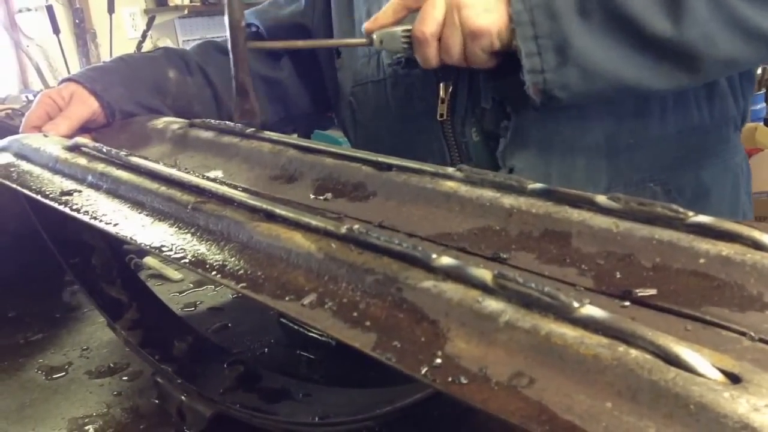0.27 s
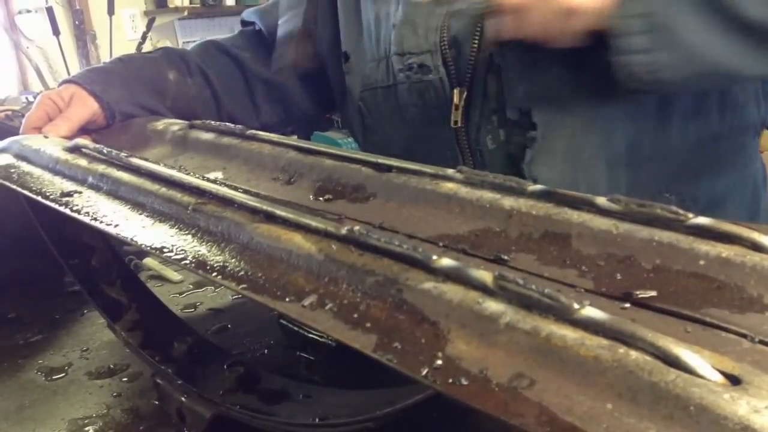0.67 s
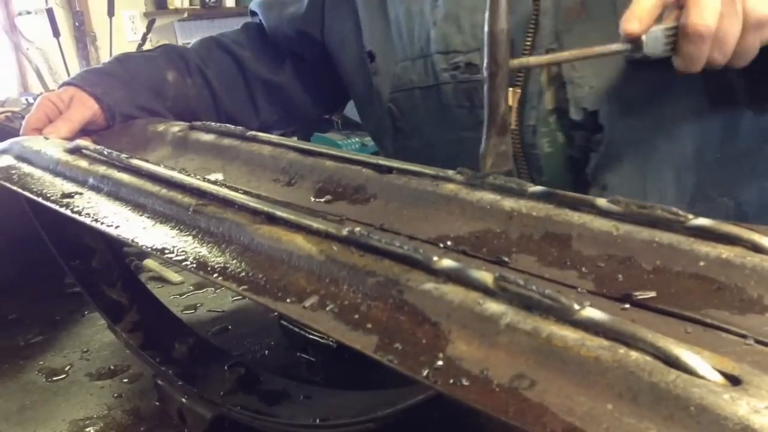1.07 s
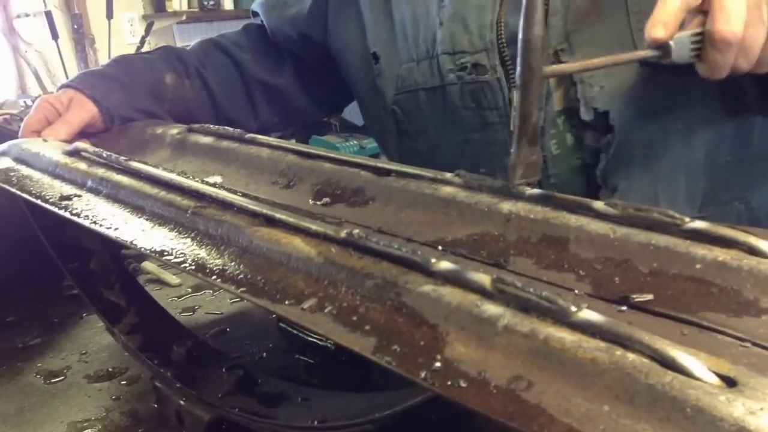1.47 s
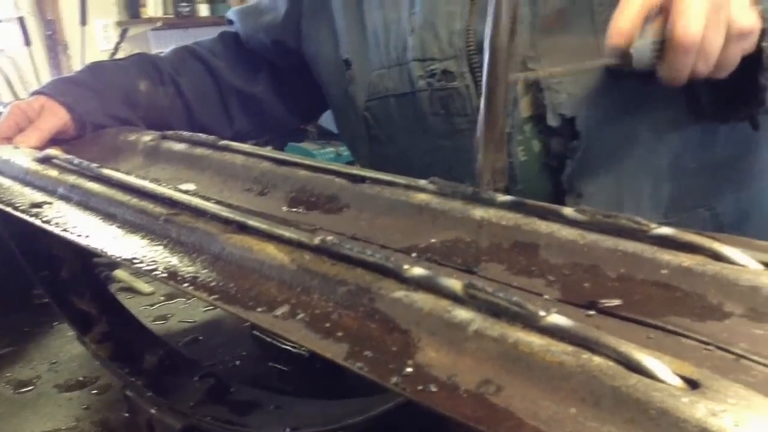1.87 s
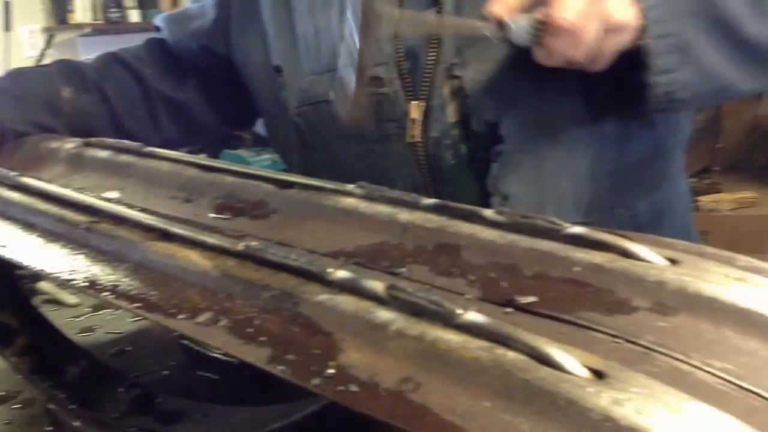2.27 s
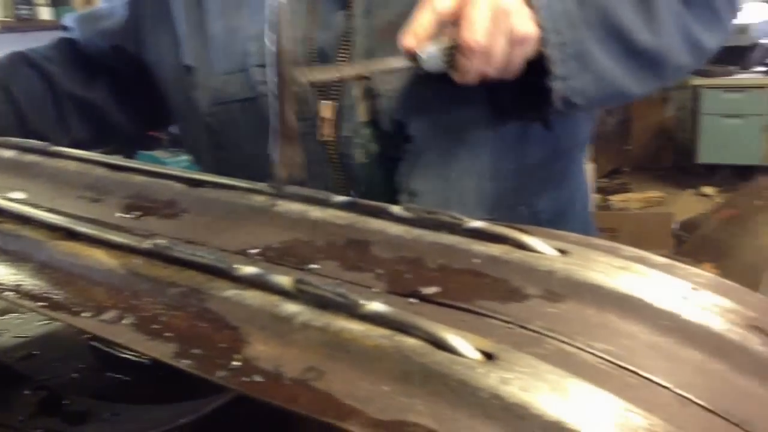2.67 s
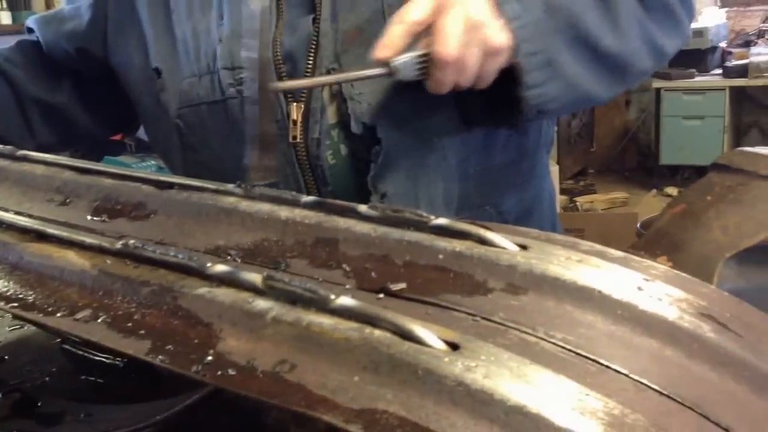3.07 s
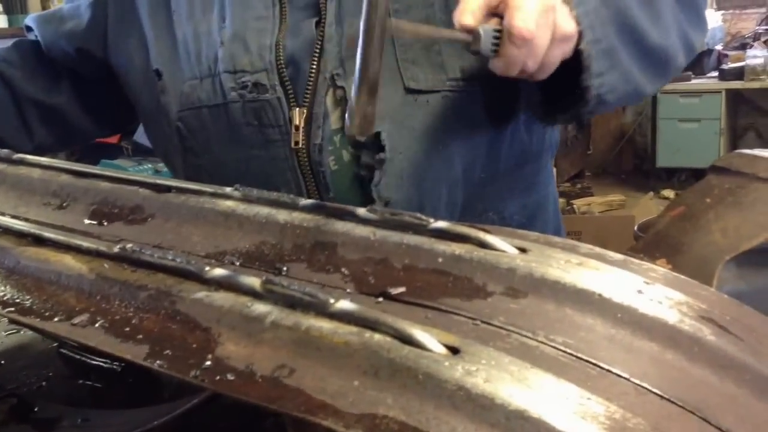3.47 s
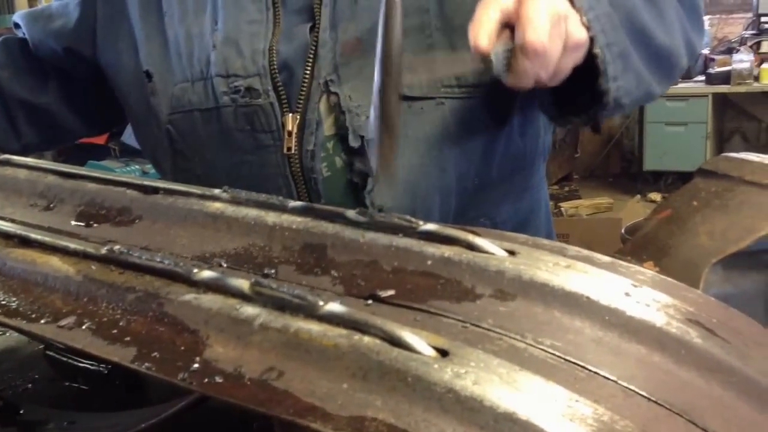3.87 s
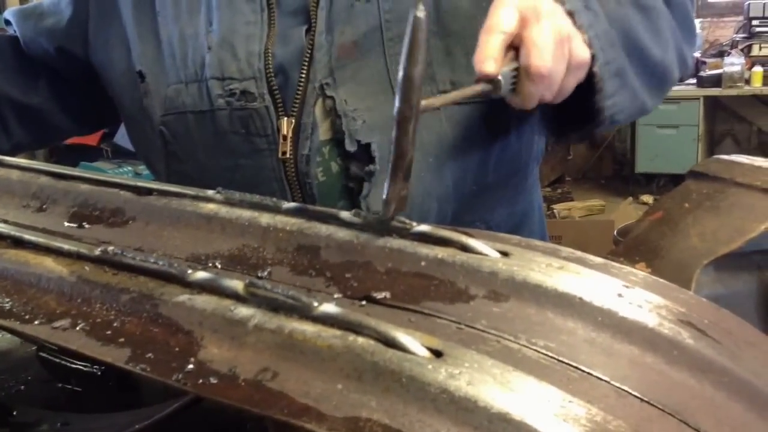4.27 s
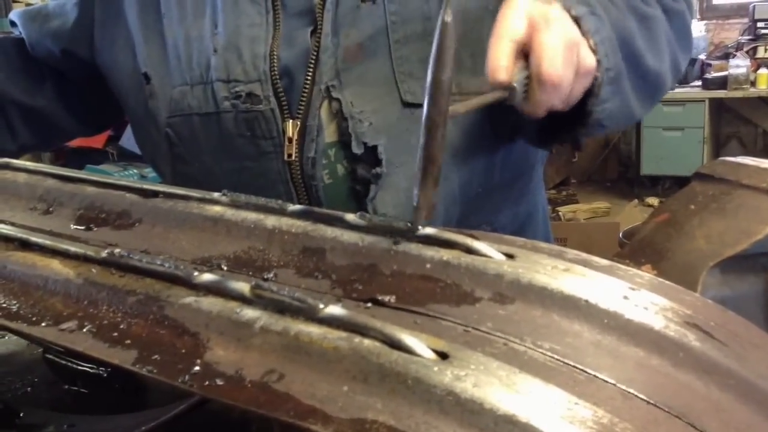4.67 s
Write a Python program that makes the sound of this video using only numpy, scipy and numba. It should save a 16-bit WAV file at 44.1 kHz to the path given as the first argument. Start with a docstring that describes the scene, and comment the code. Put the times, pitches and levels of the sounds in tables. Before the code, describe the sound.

Close to a camera microphone in a small workshop, a chipping hammer hits a long steel runner in quick, even blows. Each gives a sharp gritty crack and a hard clanging ring, soon damped. After four strokes there is a brief pause with slag chips skittering, then steady hammering resumes to the end, the last blow strongest.

```python
"""In a small workshop, a chipping hammer knocks slag off weld beads on a long curved steel runner.
Each blow is a burst of bright noise plus ringing steel: fading sine waves for the clear tones, and bands
of noise for the many tones that blur into a clang. Hand and bench damp the ringing.
Slag crumbs and chips are grainy hiss, bench jolts are low sine waves, and the room adds a short noise tail.
A camera close by cuts the bass, holds down loud peaks and removes the top treble; faint noise runs throughout."""
import sys
import numpy as np
from scipy import signal
from scipy.fft import rfft, irfft, next_fast_len
from scipy.io import wavfile
from numba import njit

SR = 44100
rng = np.random.default_rng(int(sys.argv[2]) if len(sys.argv) > 2 else 0)


def dump_mix(stems):
    """Bounce the given channels to the path in sys.argv[1] as a 16-bit WAV at rate SR."""
    frames = np.atleast_2d(stems).T  # one column per channel
    limited = np.clip(frames, -1, 1)  # hard clip at full scale
    pcm = np.round(limited * 32767).astype(np.int16)
    wavfile.write(sys.argv[1], SR, pcm)


N = 211937
# extra samples before time 0, for the blow that falls earlier; the total suits a fast Fourier transform
LEAD = next_fast_len(N + SR // 4) - N


def undb(db):
    """Turn decibels into a plain amplitude factor."""
    return 10 ** (np.asarray(db) / 20)


def along(hz, table, column):
    """Read a table between its rows, on a log-frequency axis."""
    table = np.array(table)
    return np.interp(np.log(hz), np.log(table[:, 0]), table[:, column])


def colour(x, gain):
    """Shape the spectrum of x by gain(Hz)."""
    hz = np.maximum(np.fft.rfftfreq(len(x), 1 / SR), 1)
    return irfft(rfft(x) * gain(hz), len(x))


def grit(total, grain_db, grain_s=0.0025):
    """Noise whose level jumps at random from one short grain to the next."""
    size = max(int(grain_s * SR), 1)
    grains = rng.standard_normal(total // size + 1)
    steps = np.repeat(grains, size)[:total]
    return rng.standard_normal(total) * undb(grain_db * steps)


def bursts(times, dbs, t60s, shape):
    """Add a fading shape(t, number) at each time; each burst stops after a third of a second."""
    out = np.zeros(N + LEAD + SR)
    t = np.arange(SR // 3) / SR
    for k, (s, db, t60) in enumerate(zip(times, dbs, t60s)):
        i = int(s * SR) + LEAD
        out[i:i + len(t)] += undb(db - 60 * t / t60) * shape(t, k)
    return out[:N + LEAD]


@njit
def ring(starts, kicks, poles, rise, brake):
    """Each mode (one way the steel vibrates) is kicked by every blow, swells in by rise and dies away."""
    out = np.zeros(starts[-1])
    for m in range(kicks.shape[1]):
        z, late = 0j, 0j
        for b in range(len(starts) - 1):
            z += kicks[b, m]
            # taking away a copy that dies sooner makes the new kick swell in
            late = kicks[b, m]
            p = poles[b, m]
            for i in range(starts[b], starts[b + 1]):
                out[i] += (z - late).imag
                z *= p
                late = late * p * rise + 1e-30
                # damping tightens until the next blow resets it
                p *= brake
    return out


# Hammer blows: t/s, strength level/dB (relative), treble level/dB, low clatter level/dB,
# ring length factor, bench jolt level/dB, slag crumbs level/dB,
# landing place along the runner/cm, distance off its centre line/cm
BLOWS = [(-0.15, 0.5, -4, -6, 1.1, -43.5, -34.0, 18.8, -6),
         (0.0669, 1.0, -3.5, -2.5, 0.72, -58.0, -36.0, 16.5, -8),
         (0.2749, 2.5, 1, -4.5, 0.81, -52.0, -26.5, 32.9, 5.5),
         (0.4747, 2.0, -2.5, -0.5, 0.8, -55.0, -33, 31.5, -5.5),
         (0.6916, -2.0, 1.5, 2.5, 1.02, -57.0, -42.0, 17.4, -8),
         (1.2744, 3.0, -5.5, -3.0, 0.9, -54.0, -44.0, 36, 5.5),
         (1.496, 2.5, -2.0, -0.5, 0.6, -53.0, -50, 40.4, 0.5),
         (1.701, -2, 6.5, 1.0, 0.91, -29, -36.0, 35, -5.5),
         (1.9151, 3.5, -5.5, -4.5, 0.79, -57.0, -35.0, 38.1, 6.5),
         (2.13, 2.0, 4, -4.5, 0.94, -20.0, -48.0, 41.1, -7.5),
         (2.378, 1.5, 1, -3.0, 0.97, -29, -29.5, 45, 10),
         (2.6055, 0.5, -6.5, -2.5, 1.006, -50.0, -48, 41.9, 1.3),
         (2.8445, 0.5, 2, 0, 1.09, -32.0, -29.5, 46, 8.5),
         (3.0766, 1.5, 1.5, -1, 1.05, -42.0, -34.0, 53.5, 4.6),
         (3.2833, 4.5, 1, -5, 1.01, -57.0, -30.5, 54.5, 4.5),
         (3.5734, 3.0, -1.5, -1.5, 1.01, -32, -26.5, 70.6, 1.1),
         (3.7957, 0.5, -0.5, -2, 1.02, -48.0, -41, 76.8, 0.7),
         (4.0192, 4.5, 1, 0.5, 0.79, -36.0, -32, 83.2, -1.3),
         (4.248, 3.0, 0.5, -2.5, 0.95, -23.0, -34, 79.6, -5.5),
         (4.4779, 4, -2.5, -2.0, 0.87, -41.0, -28.5, 81.0, -5.5),
         (4.7052, 9, 4.0, -4.5, 1.1, -35.0, -32.0, 104, 1.2)]


def cracks(crack_db=-3, t60=0.057, dull_hz=10000):
    """Brittle slag breaks under the hammer's edge: a short bright burst of grainy noise."""
    blows = np.array(BLOWS)
    x = bursts(blows[:, 0], blows[:, 1] + crack_db, np.full(len(blows), t60),
               lambda t, k: grit(len(t), 4.6))
    band = signal.butter(1, [2500, dull_hz], "band", fs=SR, output="sos")
    return signal.sosfilt(band, x)


# Clear tones of the runner: f/Hz, t60/s (time to fade by 60 dB, before the ring length factor),
# level/dB at an antinode (spot of strongest vibration), node (still spot) spacing along/cm,
# an antinode along/cm, node spacing across/cm, an antinode across/cm
TONES = [(486, 0.52, -20, 22.6, 4.2, 75.7, 41.7), (702.0, 0.76, -16, 44.0, 14.7, 8.64, 5.93),
         (987.0, 0.58, -19, 7.4, 1.0, 30.6, 0.2), (1104.0, 0.51, -15, 45.5, 17.8, 9.97, 8.13),
         (1158.4, 0.69, -15, 46.3, 18.4, 19.34, 17.5), (1395, 0.49, -16.5, 52, 37, 27.3, 10.9),
         (1853, 0.19, -4, 22.96, 3.8, 8.34, 6.1), (1978, 0.39, -12, 12.1, 1.07, 7.3, 2.9),
         (2655, 0.19, -8.9, 18.05, 10.44, 15, 3.85)]


def standing(blows, tones, node_leak=0.09):
    """Level in dB of each clear tone: full at an antinode of its standing wave, faint at a node."""
    lengthwise = np.cos(np.pi * (blows[:, 7:8] - tones[:, 4]) / tones[:, 3])
    crosswise = np.cos(np.pi * (blows[:, 8:9] - tones[:, 6]) / tones[:, 5])
    # node_leak: share of a tone that still sounds when the hammer lands on a node
    return tones[:, 2] + 20 * np.log10(np.hypot(lengthwise * crosswise, node_leak))


def clank(blows, starts, force_db, grip, centre_hz=2644, spread_octaves=0.061, level_db=-21.5,
          scatter_db=4.5, t60_s=0.19, rise_s=0.0042, count=12):
    """A knot of close modes round the highest clear tone, struck hardest where that tone is."""
    hz = centre_hz * 2 ** (spread_octaves * rng.standard_normal(count))
    chance = rng.standard_normal((len(blows), 2, count))
    place_db = standing(blows, np.array(TONES))[:, -1:] - TONES[-1][2]
    db = force_db + place_db + level_db + scatter_db * chance[:, 0]
    poles = np.exp((2j * np.pi * hz - np.log(1000) / (t60_s * grip)) / SR)
    kicks = undb(db) * np.exp(2j * chance[:, 1])
    return ring(starts, kicks, poles, np.exp(-1 / (rise_s * SR)), 1.)


# Plate modes so close that they blur into a clang:
# f/Hz, level/dB per third of an octave, t60/s (before the ring length factor)
CROWD = [(60, -31, 0.89), (131, -50, 0.49), (256, -41.5, 0.34), (444, -35, 0.46), (844, -37, 0.42),
         (1120, -23, 0.29), (1590, -30, 0.38), (2260, -20.5, 0.25), (3980, -23, 0.26), (5570, -22.5, 0.23),
         (10370, -22.5, 0.13), (12700, -28, 0.093), (15200, -49, 0.081)]


def crowd(blows, starts, force_db, grip, scatter_db=1.88, rise_s=0.005, settle_s=0.56,
          jag_db=1.0, spacing_hz=25):
    """Overlapping plate modes: bands of noise, each with its own fading, struck together."""
    total = starts[-1]
    out = np.zeros(total)
    bins = np.maximum(np.fft.rfftfreq(total, 1 / SR), 1)
    # a jagged spectrum lets some of the overlapping modes stand out a little
    jags = np.interp(bins, np.arange(1500) * spacing_hz, rng.standard_normal(1500))
    thicket = rfft(rng.standard_normal(total)) * undb(jag_db * jags)
    rise, brake = np.exp(-1 / (rise_s * SR)), np.exp(-1 / (settle_s * SR) ** 2)
    for f in 62.5 * 2 ** (np.arange(25) / 3):
        # how far the blow's treble and low clatter settings reach into this band
        sharp = 1 / (1 + (4000 / f) ** 2)
        dull = 1 / (1 + (f / 600) ** 4)
        db = force_db + along(f, CROWD, 1) + sharp * blows[:, 2:3] + dull * blows[:, 3:4]
        db = db + scatter_db * rng.standard_normal(db.shape)
        fade = np.exp(-np.log(1000) / (along(f, CROWD, 2) * grip * SR)) + 0j
        # a pole without pitch gives a level curve instead of a tone
        envelope = ring(starts, 1j * undb(db), fade, rise, brake)
        window = np.cos(np.clip(3 * np.log2(bins / f), -1, 1) * np.pi / 2)
        band = irfft(thicket * window, total)
        out += envelope * band / band.std()
    return out


# Weaker tones, with levels stirred by chance: f/Hz, level/dB, t60/s (before the ring length factor)
OVERTONES = [(150.8, -42, 0.47), (356, -39, 0.32), (445, -41, 0.41), (501, -45, 0.74), (644, -32, 0.51),
             (1280, -49, .4), (1724, -27.5, 0.24), (2060, -38.5, 0.18), (2400, -47, .3),
             (2504, -19.5, 0.18), (2680, -17, 0.16), (3270, -43.5, 1), (3590, -39, 0.17)]


def steel(drive_db=10, scatter_db=4, wander=0.0022, rise_s=0.022, settle_s=0.15):
    """Bending waves ring the runner: returns its clear and weaker tones, then the clank and clang."""
    blows, tones, over = np.array(BLOWS), np.array(TONES), np.array(OVERTONES)
    starts = np.r_[(blows[:, 0] * SR).astype(int) + LEAD, N + LEAD]
    force_db = blows[:, 1:2] + drive_db
    grip = np.clip(blows[:, 4:5], .3, 3)
    hz, t60 = np.r_[tones[:, 0], over[:, 0]], np.r_[tones[:, 1], over[:, 2]]
    # three random draws for each tone in each blow: level, phase, pitch
    chance = rng.standard_normal((len(blows), 3, len(hz)))
    over_db = over[:, 1] + scatter_db * chance[:, 0, len(tones):]
    db = force_db + np.c_[standing(blows, tones), over_db]
    kicks = undb(db) * np.exp(2j * chance[:, 1])
    pitch = hz * (1 + wander * chance[:, 2])
    poles = np.exp((2j * np.pi * pitch - np.log(1000) / (t60 * grip)) / SR)
    # bending waves need a moment to fill the runner, so tones swell in
    rise = np.exp(-1 / (rise_s * SR))
    # the runner jumps free at the blow, then settles on bench and hand, which choke the tones ever harder
    brake = np.exp(-1 / (settle_s * SR) ** 2)
    clear = ring(starts, kicks, poles, rise, brake)
    clang = clank(blows, starts, force_db, grip) + crowd(blows, starts, force_db, grip)
    return clear, clang


def jolts(jolt_hz=38, t60=0.11):
    """The bench jumps and shakes the camera: a low sine wave that fades after each blow."""
    blows = np.array(BLOWS)
    return bursts(blows[:, 0], blows[:, 5], np.full(len(blows), t60),
                  lambda t, k: np.sin(2 * np.pi * jolt_hz * t))


def crumbs(t60=0.95, grain_db=4, crumb_hz=9500, width=1.0, delay_s=.03):
    """Loosened slag rains and rattles on the steel after each blow: grainy hiss that swells and fades."""
    blows = np.array(BLOWS)
    # width is in natural-log units of frequency
    hiss = colour(grit(N + LEAD, grain_db), lambda f: 1 / (1 + (np.log(f / crumb_hz) / width) ** 2))
    shower = bursts(blows[:, 0], blows[:, 6], np.full(len(blows), t60),
                    lambda t, k: 1 - np.exp(-t / delay_s))
    return shower * hiss / hiss.std()


def workshop(x, wet_db=-8, low_t60=0.44, high_t60=0.26, first_s=0.00067):
    """Direct sound plus the room's answer: a scattered tail of noise whose treble dies first."""
    t = np.arange(SR // 2) / SR
    noise = rng.standard_normal(len(t))
    low = signal.sosfilt(signal.butter(1, 2500, fs=SR, output="sos"), noise)
    high = noise - low
    tail = low * undb(-60 * t / low_t60) + high * undb(-60 * t / high_t60)
    tail = tail * np.minimum(t / first_s, 1) ** 2
    tail = tail / np.sqrt(np.sum(tail ** 2))
    return x + undb(wet_db) * signal.fftconvolve(x, tail)[:len(x)]


# Shape of the steady noise: f/Hz, level/dB per Hz (relative)
FLOOR = [(59, -49), (100, -23), (2320, -5.5), (2750, -4), (8410, -3), (10400, -3), (11300, -7),
         (15500, -5.5)]


def hush(floor_db=-47.5):
    """Faint steady air and microphone noise: random noise with a shaped spectrum."""
    x = colour(rng.standard_normal(N), lambda f: undb(along(f, FLOOR, 1)))
    return x * undb(floor_db) / x.std()


# Slag chips skittering: t/s, level/dB, length/s (a quarter of the t60), centre f/Hz
CHIPS = [(0.902, -41, 0.026, 8900), (1.016, -33, 0.066, 6700), (1.018, -40, .04, 12500),
         (1.087, -41, .006, 6000), (1.101, -42, .005, 5500), (1.135, -42.5, 0.046, 14000),
         (1.13, -38, 0.067, 9600), (1.39, -31, 0.025, 11000)]


def chips(grain_db=3.0, width=0.38):
    """Glassy chips slide over the steel: grainy hiss that swells briefly, then dies."""
    def slide(t, k):
        """One chip's hiss, gathered round its centre frequency (width in natural-log units)."""
        length, hz = CHIPS[k][2:]
        hiss = colour(grit(len(t), grain_db), lambda f: 1 / (1 + (np.log(f / hz) / width) ** 2))
        return hiss / hiss.std() * np.minimum(t / (0.28 * length) + 0.34, 1)

    s, db, length, _ = np.transpose(CHIPS)
    return bursts(s, db, 4 * length, slide)


def scene():
    """Steel, slag and room; clear tones come mostly straight from the near runner, jolts via the stand."""
    tones, clang = steel()
    in_room = clang + undb(-9.5) * tones + cracks() + chips() + crumbs()
    air = tones + workshop(in_room)
    # the camera shelves the bass steeply away below about 140 Hz
    air = colour(air, lambda f: undb(-39.5) + 1 / (1 + (140 / f) ** 12))
    return ((air + jolts())[LEAD:] + hush())[None]


@njit
def limit(x, top, attack, release):
    """Follow the peaks and lower the gain when they pass top: down fast, back up slowly."""
    y, e = np.empty(len(x)), 0.
    for i in range(len(x)):
        a = abs(x[i])
        e += (a - e) * (attack if a > e else release)
        y[i] = x[i] * top / max(e, top)
    return y


def record(dry, attack_s=0.0008, release_s=0.053, top_hz=15350):
    """The camera limits, clips what slips through and cuts the top treble."""
    held = limit(dry[0], 0.79, 1 - np.exp(-1 / (attack_s * SR)), 1 - np.exp(-1 / (release_s * SR)))
    held = np.clip(held, -.8, .8)
    treble_cut = signal.ellip(10, .2, 70, top_hz, fs=SR, output="sos")
    return np.clip(signal.sosfilt(treble_cut, held), -1, 1)[None]


dry = scene()
out = record(dry)
dump_mix(out)
```